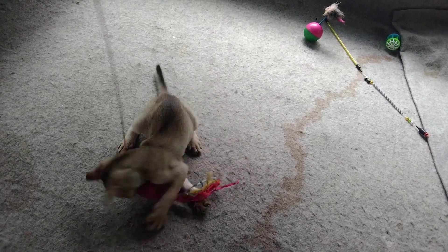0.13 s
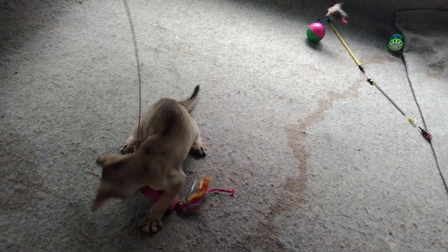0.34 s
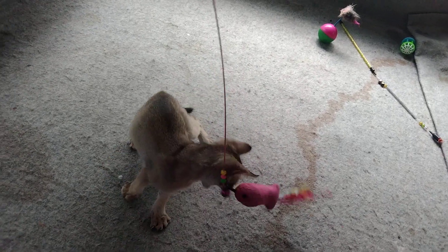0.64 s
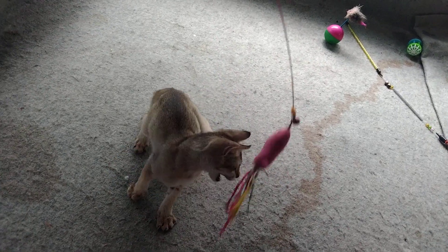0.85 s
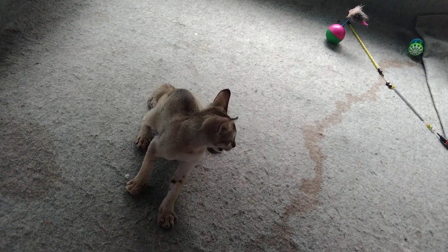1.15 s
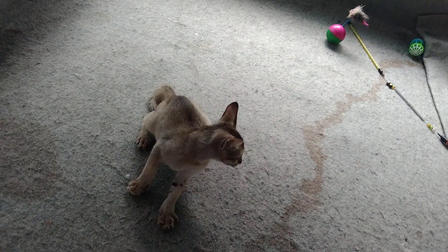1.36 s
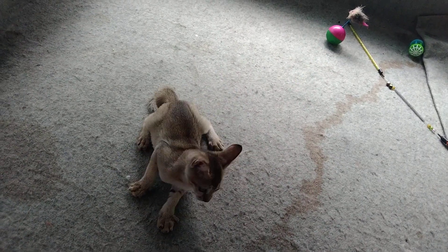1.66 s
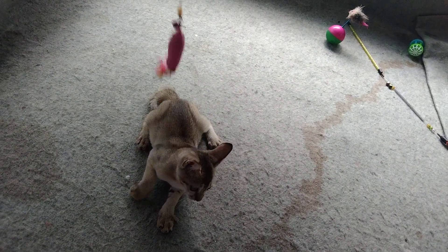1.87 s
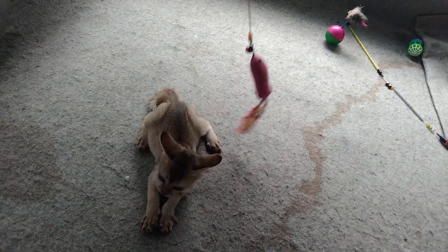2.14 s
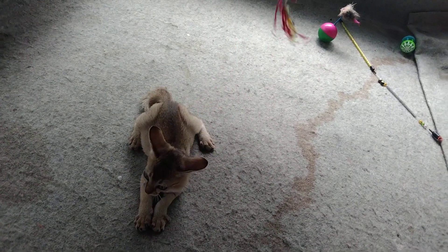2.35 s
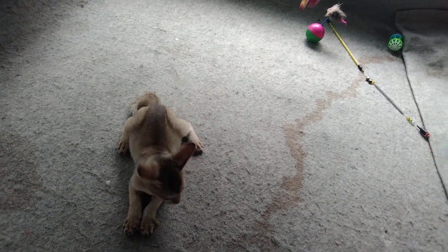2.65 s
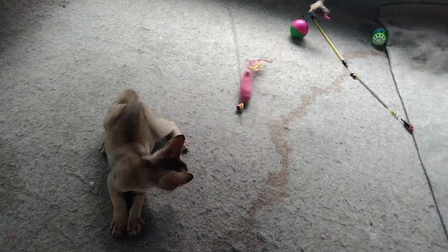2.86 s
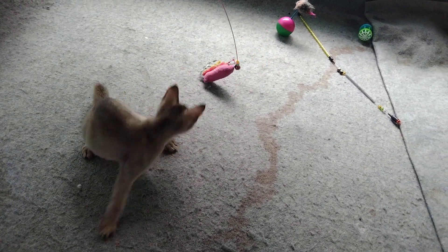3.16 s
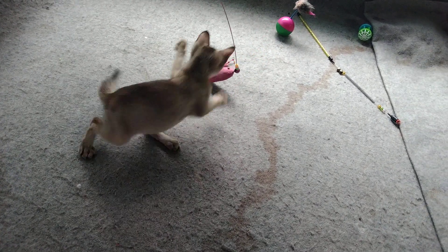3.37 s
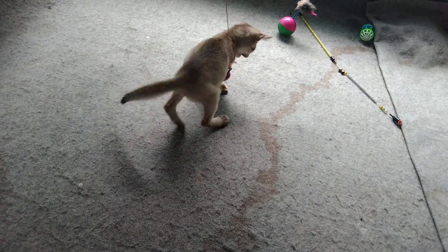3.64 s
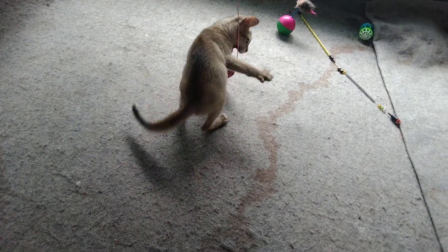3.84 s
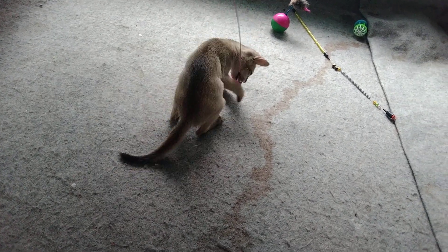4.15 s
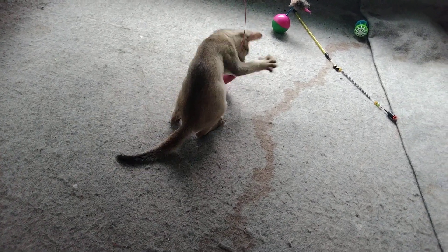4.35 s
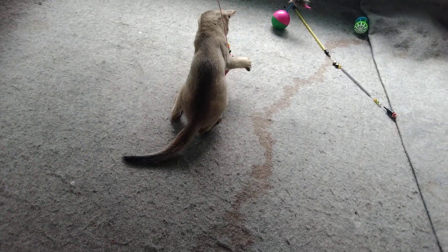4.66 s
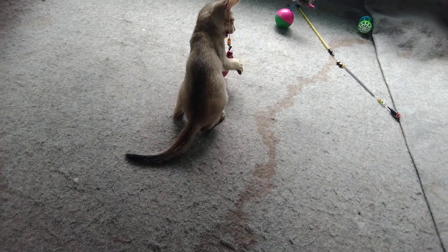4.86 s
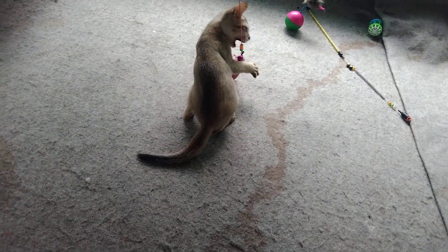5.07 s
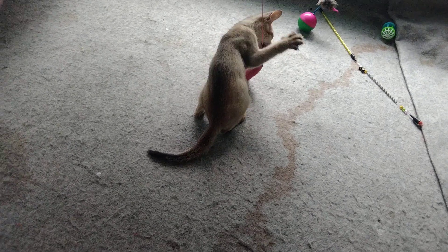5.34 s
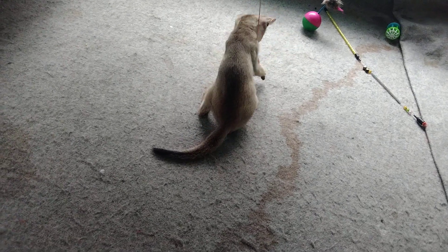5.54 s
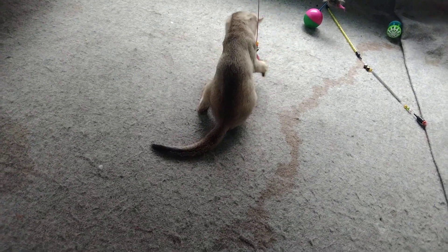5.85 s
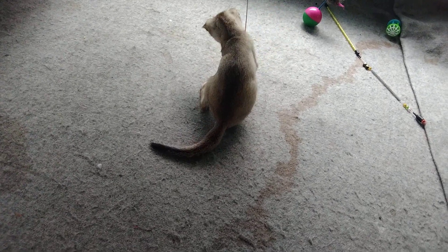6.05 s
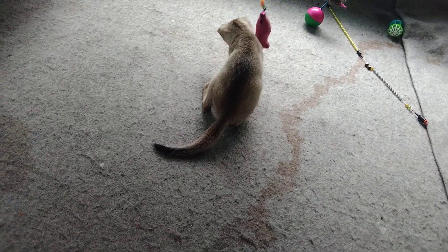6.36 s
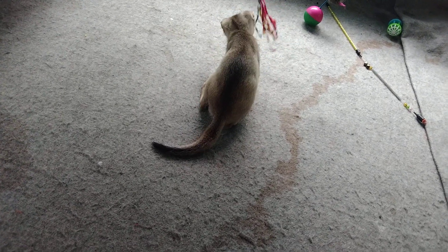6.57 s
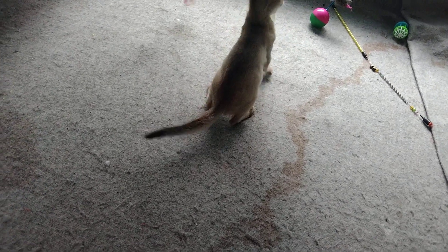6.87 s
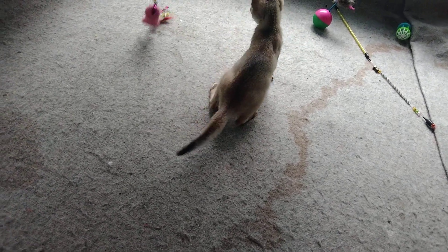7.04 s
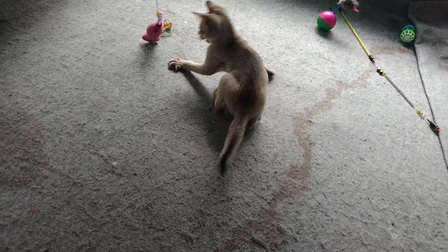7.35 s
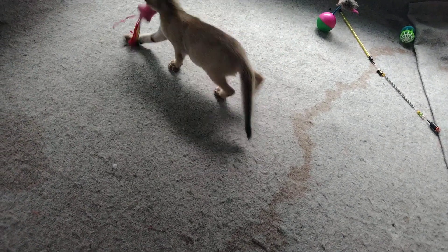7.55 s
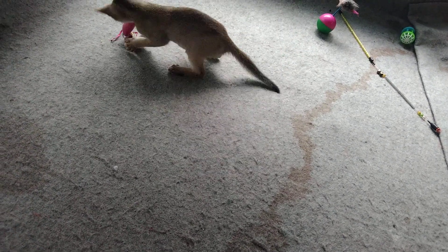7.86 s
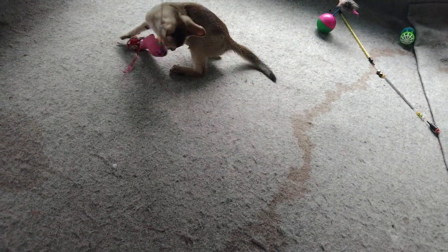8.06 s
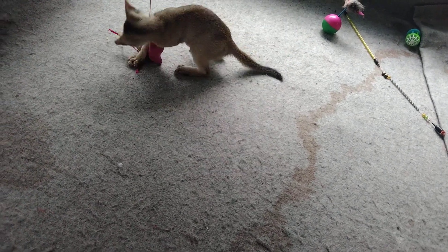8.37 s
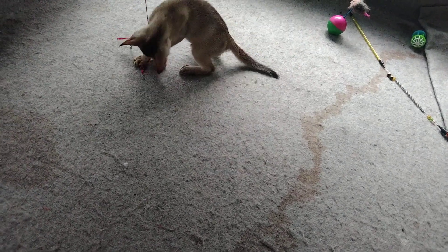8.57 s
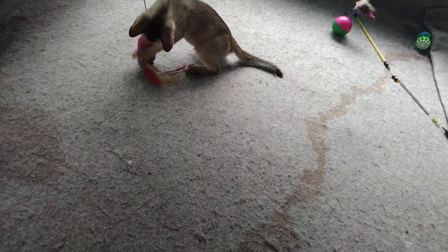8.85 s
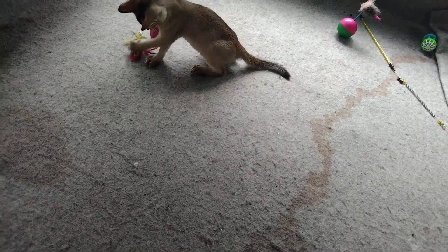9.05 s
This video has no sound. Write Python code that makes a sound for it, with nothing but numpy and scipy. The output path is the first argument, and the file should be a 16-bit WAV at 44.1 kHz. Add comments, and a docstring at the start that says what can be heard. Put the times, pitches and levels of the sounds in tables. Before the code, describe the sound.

A close, dry indoor sound of a tiny slotted bell on a wand toy over carpet. Two light tinkles come around 0.2 s, then a dense, bright rattle from 0.6 to 1.0 s, its loudest stroke near 0.65, with rustly scuffs. From 1.2 to 2.7 s only faint separate tinkles remain, with a soft airy swish around 1.8-2.1. At 2.9 s a strong knock, soft thud and sharp ring land together. Scuffing, crackle and small jingles follow at 3.5-3.7 and 4.0-4.7 s. Whooshes pass at 5.3-5.9 s amid sparse, weak tinkles that continue to 7 s. Jingling thickens from 7.1, peaks brightly at 8.1, thins, then rattles again with knocks from 8.9 to 9.2 s. Faint fuzzy chirps and an uneven low hum lie far beneath, over a quiet room floor.

```python
"""Wand-toy bell on a carpet

A small slotted metal bell on a wand toy is jerked about over a carpet while a kitten paws at it.
The loose pellet rings the shell as decaying sine modes, and its next contacts damp them again.
Knocks, swishes, dragging and thuds are shaped noise; faint narrow chirps come and go.
Beneath lie a low machine hum, built of a tone and noise, and the steady floor of a quiet room."""
import sys
import numpy as np
from scipy import signal
from scipy.fft import rfft, irfft
from scipy.io import wavfile
from scipy.ndimage import uniform_filter1d

SR = 44100
rng = np.random.default_rng(int(sys.argv[2]) if len(sys.argv) > 2 else 0)


def pcm_store(signal):
    """Save signal as 16-bit PCM."""
    levels = np.round(np.clip(np.atleast_2d(signal), -1, 1) * 32767)
    wavfile.write(sys.argv[1], SR, levels.astype(np.int16).T)


N = 406161
T = np.arange(N) / SR
SHELL_HZ, TOP_HZ = 6489, 15465  # the shell's main and highest modes


def amp(db):
    """Turns dB into a linear gain."""
    return 10 ** (np.asarray(db) / 20)


def evened(x):
    """Scales a sound to rms 1."""
    return x / np.sqrt(np.mean(x ** 2) + 1e-20)


def add(mix, s, sound):
    """Adds a sound to the mix from s seconds on."""
    part = mix[max(round(s * SR), 0):][:len(sound)]
    part += sound[:len(part)]


def columns(table):
    """Each column of a curve table, sample by sample."""
    s, *cols = np.transpose(table)
    return [np.interp(T, s, c) for c in cols]


def resonate(x, hz, width):
    """A steep resonance that follows the curve hz: shift down, smooth twice, shift back."""
    turn = np.exp(2j * np.pi * np.cumsum(hz * np.ones(len(x))) / SR)
    r = np.exp(-np.pi * width / SR)
    smooth = signal.lfilter([(1 - r) ** 2], [1, -2 * r, r * r], x / turn)
    return 2 * (turn * smooth).real


def band(x, lo_hz, hi_hz):
    """Keeps what lies between two frequencies."""
    sos = signal.butter(4, [lo_hz, hi_hz], "bandpass", fs=SR, output="sos")
    return signal.sosfilt(sos, x)


# The shell's modes. Each row: multiple of the main mode, level in dB, share of the strike's ring time.
SHELL_MODES = [(1.005, -3.5, .62), (.997, -14, .62), (1.099, -27, .9), (1.189, -31, 0.3),
               (1.301, -36, 0.25)]
RING_BEND = 2.6  # above 1 the ring first holds, then drops ever faster as the pellet stops it
REST_DB, REST_T60 = -20, 0.2  # a faint rest sings on: dB under the ring, s


def ring(hz, t60, size, spread_db=5.0):
    """The shell's modes after one blow; where the pellet lands sets their strength and phase."""
    t = np.arange(size) / SR
    start = rng.random(len(SHELL_MODES))
    place_db = spread_db * rng.standard_normal(len(SHELL_MODES))
    place_db[0] = 0
    rest = amp(REST_DB - 60 * t / REST_T60)
    modes = np.zeros(size)
    for (multiple, db, share), phase, more_db in zip(SHELL_MODES, start, place_db):
        held = amp(-60 * (t / (t60 * share)) ** RING_BEND)
        modes += amp(db + more_db) * (held + rest) * np.sin(2 * np.pi * (hz * multiple * t + phase))
    return modes * np.minimum(t / 0.00068, 1)  # soft onset


def click(parts, t60, upper_db, rise=0.0004, first_s=0.0035, lo_hz=1800):
    """A short burst of noise through two resonances that differ a little each time; rms 1 at its start."""
    t = np.arange(6000) / SR
    burst = rng.standard_normal(len(t)) * amp(-60 * t / t60) * np.minimum(t / rise, 1)
    low, high = (evened(resonate(burst, hz + 0.069 * width * rng.standard_normal(), width))
                 for hz, width in parts)
    sound = band(low - amp(upper_db) * high, lo_hz, 21000)
    return sound / np.sqrt(np.mean(sound[t < first_s] ** 2))


def bounced(sound, lag_s=0.0074, loss_db=-3.5, first_db=-7.5):
    """A contact that rebounds three times at chance moments with chance strength."""
    out = np.concatenate([sound, np.zeros(6000)])
    lags = lag_s * np.cumsum(.4 + np.minimum(rng.exponential(size=3), 3))
    for k, lag in enumerate(lags):
        gain = amp(first_db + loss_db * k + 3.8 * rng.standard_normal())
        add(out, lag, gain * sound * rng.choice([-1, 1]))
    return out


SPARK_HZ = 16200  # centre of the sparkle's wide upper part
# Resonances of the pellet's tick and of the top sparkle. Each row: centre in Hz, width in Hz.
TICK_PARTS = [(5650, 804), (7600, 1500)]
SPARKLE_PARTS = [(TOP_HZ, 220), (SPARK_HZ, 14000)]
# Pellet strikes. Each row: start in seconds, ring level in dB, ring time (t60) in seconds before each
# mode's share and the damping, tick level in dB, top sparkle level in dB.
PELLET_STRIKES = [(0.0223, -60, 0.045, -67, -88.5), (0.0917, -52, 0.11, -65, -81),
                  (0.162, -33.5, 0.051, -51, -76), (0.188, -28.5, 0.039, -45, -69),
                  (0.21, -41, 0.031, -59, -75), (0.2853, -51, 0.061, -60, -86),
                  (0.3341, -51.5, 0.07, -54, -71), (0.5924, -50, 0.048, -52.5, -74),
                  (0.618, -34.5, 0.089, -40.5, -52), (0.628, -28.5, 0.04, -47, -53),
                  (0.6513, -18.5, 0.04, -39.5, -50.5), (0.6822, -44, 0.086, -35.5, -59),
                  (0.6938, -25.5, 0.066, -47, -57), (0.7262, -29, 0.084, -41, -58),
                  (.7305, -41, .03, -37, -62), (0.7337, -27.5, 0.052, -51, -64),
                  (0.7514, -31, 0.064, -46, -64), (0.7822, -31.5, 0.029, -47, -70),
                  (0.8031, -27, 0.046, -43.5, -55), (.829, -33, 0.034, -45, -58),
                  (0.836, -32.5, 0.06, -54, -61), (.8505, -46, .03, -46, -52),
                  (0.856, -27.5, 0.043, -39, -53), (0.948, -43.5, 0.14, -52, -57),
                  (0.9863, -30, 0.042, -41, -51), (.998, -37.5, 0.045, -42, -64),
                  (1.1777, -46, 0.065, -60, -73), (1.1897, -40, 0.061, -63, -72),
                  (1.2201, -42.5, 0.23, -49.5, -70), (1.3079, -60, 0.024, -55.5, -71),
                  (1.3673, -43, 0.11, -49.5, -59.5), (1.4671, -44.5, 0.041, -62, -77),
                  (1.5444, -56, 0.099, -72, -91), (1.6102, -51, 0.1, -67, -95),
                  (1.6726, -55, 0.059, -69, -82), (1.7684, -44, 0.052, -65, -80),
                  (2.0208, -47, 0.083, -56, -77), (2.0428, -41.5, 0.091, -57.5, -69),
                  (2.082, -46.5, 0.07, -58, -71), (2.134, -40.5, 0.07, -55, -72),
                  (2.168, -40.5, 0.055, -54, -73), (2.3627, -40.5, 0.041, -57.5, -69),
                  (2.5384, -55, 0.2, -58, -67), (2.588, -46, 0.099, -54, -70),
                  (2.6389, -31, 0.069, -43.5, -63), (2.7327, -45, 0.041, -55, -72),
                  (2.8449, -44.5, 0.052, -47, -54), (2.913, -27.5, 0.078, -30, -36),
                  (2.9264, -28.5, 0.072, -53, -52), (3.0101, -24, 0.038, -41.5, -62),
                  (3.0624, -44, 0.032, -52, -79), (3.1951, -58.5, 0.11, -58.5, -93),
                  (3.2809, -54.5, 0.072, -58, -91), (3.4241, -59, 0.039, -59.5, -67),
                  (3.512, -51, 0.041, -38.5, -47), (3.5384, -45, 0.035, -43, -58),
                  (3.5584, -44, 0.093, -47, -57), (3.5862, -41, 0.05, -46, -63),
                  (3.597, -41, .05, -46, -62), (3.611, -44, 0.045, -50, -70),
                  (3.6404, -52, 0.06, -48.5, -52), (3.647, -56, .04, -52, -60),
                  (3.6601, -44.5, 0.06, -53, -59), (3.678, -45.5, .07, -54, -62),
                  (3.7194, -58, 0.065, -66, -72), (3.7379, -45.5, 0.13, -53, -56),
                  (3.8123, -61, 0.07, -58, -60.5), (3.8975, -45, 0.087, -63, -71),
                  (3.9208, -43.5, 0.045, -69, -66), (4.0133, -39, 0.11, -48, -62),
                  (4.0394, -41, 0.2, -44.5, -55), (4.1679, -51.5, 0.096, -54.5, -67),
                  (4.2335, -32.5, 0.045, -40, -66), (4.3515, -51, 0.06, -64, -103),
                  (4.4184, -59, 0.098, -64, -89), (4.4598, -38.5, 0.053, -51.5, -65),
                  (4.5107, -43, 0.12, -52, -58), (4.5401, -35, 0.028, -43.5, -44),
                  (4.573, -43, 0.065, -62, -65), (4.6299, -52, 0.035, -53, -75),
                  (4.645, -50, .05, -50.5, -75), (4.7067, -45, 0.29, -64, -56.5),
                  (4.7192, -43.5, 0.15, -54.5, -63.5), (4.9672, -55.5, .05, -60.5, -72),
                  (5.0365, -54, 0.069, -60.5, -91), (5.2714, -42, 0.029, -60, -79),
                  (5.3108, -49.5, 0.034, -64, -71), (5.3418, -49, 0.088, -68, -81),
                  (5.448, -50.5, 0.038, -58, -65), (5.4776, -60, 0.034, -53.5, -62),
                  (5.5624, -50, 0.21, -54, -62), (5.69, -53.5, 0.33, -64, -88),
                  (5.7209, -47.5, 0.064, -54.5, -81), (5.976, -52, 0.11, -60.5, -78),
                  (6.0521, -45, 0.058, -52.5, -72), (6.0921, -50, 0.15, -56, -69),
                  (6.1539, -49, 0.088, -59, -66), (6.2277, -44, 0.12, -66, -62),
                  (6.3405, -39.5, 0.041, -64, -75), (6.3836, -47.5, 0.051, -61, -77),
                  (6.4647, -49.5, 0.081, -67, -69), (6.5233, -48.5, 0.23, -58.5, -74),
                  (6.5885, -49.5, 0.1, -61, -79), (6.6295, -44.5, 0.095, -58, -73.5),
                  (6.9522, -46.5, 0.037, -62, -76.5), (7.005, -51, 0.044, -54.5, -69),
                  (7.0756, -56, 0.04, -65, -93), (7.1115, -57, 0.19, -59, -72),
                  (7.1558, -39.5, 0.064, -48, -68), (7.1904, -39, 0.061, -52, -63),
                  (7.2175, -43, 0.023, -51, -69), (7.2483, -41, 0.036, -53, -80),
                  (7.299, -32.5, 0.034, -55, -72), (7.3238, -32, 0.035, -49.5, -70),
                  (7.3457, -36.5, 0.033, -57, -86), (7.4524, -46, 0.099, -57, -77),
                  (7.4714, -38.5, 0.065, -50, -63), (7.5606, -48.5, 0.13, -49, -63),
                  (7.5834, -38.5, 0.065, -46, -66), (7.6101, -40.5, 0.36, -49, -54),
                  (7.6606, -41.5, 0.21, -47.5, -50.5), (7.741, -51, 0.07, -52.5, -59),
                  (7.7669, -41.5, 0.078, -64, -63), (7.8727, -40.5, 0.13, -56, -77),
                  (7.9377, -47.5, 0.041, -71, -65), (8.0421, -47.5, 0.05, -52.5, -53),
                  (8.08, -25, 0.082, -45, -65), (8.0842, -22, 0.041, -37, -51),
                  (8.1265, -52, 0.029, -55, -68), (8.1529, -41.5, 0.066, -62, -75),
                  (8.1668, -45, 0.041, -56, -73), (8.2533, -52, 0.065, -53, -71),
                  (8.2721, -40, 0.05, -47.5, -65), (8.284, -42, 0.041, -58, -70),
                  (8.317, -40, 0.021, -63, -76), (8.35, -40.5, 0.044, -58, -57),
                  (8.359, -41, 0.08, -60, -64), (8.4462, -39.5, 0.05, -54, -69),
                  (8.5445, -56, 0.039, -62, -80), (8.5769, -42, 0.017, -56.5, -70),
                  (8.7354, -56.5, 0.061, -60, -80), (8.9434, -50, 0.06, -53, -61),
                  (8.963, -28, 0.033, -41, -47), (8.977, -29.5, 0.057, -43, -49),
                  (8.989, -32.5, 0.089, -48, -56), (9.011, -45, .05, -43, -52),
                  (9.0297, -40, 0.053, -47, -61), (9.0573, -42.5, 0.16, -53, -63),
                  (9.0983, -43, 0.055, -55, -62), (9.1602, -35, 0.027, -43, -62),
                  (9.168, -33, 0.034, -44.5, -64)]


def strikes(kept=0.26):
    """Each strike rings the shell; the pellet's next contacts swallow part of the ring."""
    shell, top = np.zeros(N), np.zeros(N)
    times = np.array([row[0] for row in PELLET_STRIKES])
    for s, ring_db, t60, tick_db, sparkle_db in PELLET_STRIKES:
        t = s + np.arange(8000) / SR
        later = np.searchsorted(times, t) - np.searchsorted(times, s, "right")
        damping = uniform_filter1d(kept ** np.maximum(later, 0), size=60)
        hz = SHELL_HZ * (1 + 0.003 * rng.standard_normal())  # the resting pellet detunes the shell
        add(shell, s, amp(ring_db) * ring(hz, t60, len(t)) * damping)
        tick = click(TICK_PARTS, 0.004, -9.5, first_s=0.003, lo_hz=4800)
        add(shell, s, amp(tick_db) * bounced(tick, lag_s=0.0045, loss_db=-2.0))
        add(top, s, amp(sparkle_db) * click(SPARKLE_PARTS, 0.014, -2.7))
        top_hz = TOP_HZ * (1 + 0.0017 * rng.standard_normal())
        high = amp(-60 * (t - s) / 0.095) * np.sin(2 * np.pi * top_hz * t)
        add(top, s, amp(sparkle_db - 0.5) * high * damping)
    return shell, top


# Glancing blows on the slot's lips. Each row: start in seconds, peak level in dB before the decay.
LIP_BLOWS = [(.0914, -57), (.9624, -51), (3.5214, -50), (3.6651, -49), (3.7209, -52), (4.4199, -62),
             (4.7195, -55), (7.453, -50), (7.935, -64), (8.358, -61)]
LIP_HZ, LIP_T60 = 7125, 0.18  # the second mode, which rings alone: Hz, s


def lips():
    """A thin higher ring that the pellet does not stop: one decaying sine a blow."""
    t, out = np.arange(8000) / SR, np.zeros(N)
    for s, db in LIP_BLOWS:
        fade = amp(db - 60 * t / LIP_T60) * np.minimum(t / 0.0012, 1)
        add(out, s, fade * np.sin(2 * np.pi * LIP_HZ * t))
    return out


def after(times, levels_db, settle_db_per_s):
    """A gain that jumps at each event and sinks steadily afterwards."""
    jumps, fall = np.full(N, -200.), settle_db_per_s * T
    jumps[np.round(np.asarray(times) * SR).astype(int)] = levels_db
    sinking_db = np.maximum.accumulate(jumps + fall) - fall
    return uniform_filter1d(amp(sinking_db), size=200)


# The toy in motion, as curves. Each row: time in seconds, base level in dB of the pellet's rolling,
# of the dragging on the pile and of the fine hiss.
MOTION = [(0.0, -57, -74, -80.5), (0.54, -84, -84.5, -83.5), (0.82, -49, -74, -73),
          (1.05, -73.5, -93.5, -88.5), (1.48, -62, -92.5, -91.5), (1.9, -78.5, -83, -87.5),
          (2.92, -62.5, -81, -88.5), (3.41, -77, -73, -87), (3.72, -57.5, -68, -90), (4.33, -72, -80, -82),
          (4.64, -50.5, -67, -74), (4.87, -73, -84.5, -88.5), (5.23, -75, -90, -100),
          (5.57, -64.5, -77, -87.5), (5.98, -68.5, -83.5, -96), (6.23, -60, -74, -80.5),
          (6.46, -62, -97, -90.5), (6.69, -81, -103, -90.5), (7.62, -66, -77.5, -78.5),
          (8.21, -69, -77.5, -90.5), (8.85, -81, -77.5, -90), (9.21, -57, -75, -76)]
ROLL_AFTER_DB, ROLL_SETTLES_DB_PER_S = -32.5, 98.5  # the pellet rolls on after each strike


def rolling(per_s=260, spread_db=5.5, tick_db=-9.0, count=6):
    """Many tiny contacts of chance size and place, each a tick and a short ring."""
    sizes = amp(spread_db * np.minimum(rng.exponential(1, N), 2.5))
    hits = sizes * (rng.random(N) < per_s / SR)
    place, rattle = rng.integers(0, count, N), np.zeros(N)
    for k in range(count):
        touch = ring(SHELL_HZ * (1 + .003 * rng.standard_normal()), 0.046, size=6000)
        touch = touch + amp(tick_db) * click(TICK_PARTS, 0.0044, -10.5, lo_hz=4700)
        rattle += signal.oaconvolve(hits * (place == k), touch)[:N]
    s, ring_db = np.transpose(PELLET_STRIKES)[:2]
    rolls_on = after(s, ring_db + ROLL_AFTER_DB, ROLL_SETTLES_DB_PER_S)
    return (amp(columns(MOTION)[0]) + rolls_on) * evened(rattle)


# Resonances of the toy's body and of the crackle. Each row: centre in Hz, width in Hz.
BODY_PARTS = [(2500, 540), (3700, 2700)]
CRACKLE_PARTS = [(9500, 3800), (13500, 1900)]
# Paws and pile jolt the toy's body. Each row: start in seconds, knock peak in dB,
# knock decay time (t60) in seconds, crackle level in dB.
JOLTS = [(0.134, -68, 0.044, -66), (0.346, -58.5, 0.051, -71), (0.374, -84, 0.04, -63),
         (0.5028, -55, 0.12, -68), (0.559, -50.5, 0.036, -74), (0.855, -46, 0.047, -47.5),
         (0.879, -50.5, 0.048, -55), (.964, -67, .03, -56), (0.9816, -52, 0.04, -60),
         (2.5739, -64, 0.064, -59), (2.85, -45, 0.062, -59), (2.874, -47, 0.03, -54),
         (2.91, -32.5, 0.055, -44), (3.024, -46.5, 0.032, -62), (3.1004, -54.5, 0.26, -75),
         (3.1694, -50, 0.024, -89), (3.5094, -38.5, 0.048, -51), (3.5387, -46.5, 0.024, -66),
         (3.6404, -49, 0.024, -56), (3.7194, -54, 0.024, -62), (4.0087, -38.5, 0.015, -56),
         (4.0279, -43.5, 0.1, -52.5), (4.054, -44, .02, -58), (4.067, -39.5, 0.03, -54),
         (4.08, -46, 0.01, -58), (4.4995, -40, 0.1, -69), (4.5262, -34.5, 0.016, -47.5),
         (4.558, -42, 0.021, -67), (4.604, -42.5, 0.016, -52), (4.7, -46.5, 0.046, -67),
         (5.1757, -45.5, 0.022, -92), (5.4495, -44, 0.035, -53.5), (5.564, -51.5, 0.022, -58.5),
         (6.2266, -52.5, 0.15, -63), (7.016, -54, 0.033, -59.5), (7.1505, -54.5, 0.26, -67),
         (7.558, -42, 0.048, -52.5), (7.6224, -40, 0.029, -58), (7.763, -52, 0.033, -66),
         (7.814, -51.5, 0.029, -69), (7.905, -51.5, 0.027, -64.5), (8.043, -47.5, 0.03, -57),
         (8.0678, -48.5, 0.043, -71), (8.1376, -44.5, 0.018, -54.5), (8.1852, -47, 0.016, -66),
         (8.2686, -49, 0.024, -57), (8.407, -50.5, 0.038, -68), (8.456, -52, 0.051, -66),
         (8.574, -49.5, 0.025, -70), (8.736, -48, 0.026, -66.5), (8.9208, -38, 0.017, -60),
         (8.9447, -41, 0.062, -54), (8.995, -41, 0.06, -59), (9.011, -40, 0.038, -50),
         (9.084, -50, 0.1, -67), (9.133, -52, 0.034, -74), (9.1628, -43, 0.022, -56)]


def knocks():
    """Dull noise scuffs of the body with a stuttering crackle of foil and feathers above."""
    out = np.zeros(N)
    for s, knock_db, t60, crackle_db in JOLTS:
        body = click(BODY_PARTS, t60, -6.5, rise=0.0023)
        add(out, s, amp(knock_db) * body / abs(body).max())
        crackle = click(CRACKLE_PARTS, 0.33 * t60, -3.0, first_s=0.0021)
        add(out, s, amp(crackle_db) * bounced(crackle, lag_s=0.005, first_db=-13.5))
    return out


def streaked(x, patchy_db):
    """Narrow bands of the sound swell and sink for a tenth of a second or less at a time."""
    z = signal.stft(x, nperseg=512)[2]
    patches = rng.standard_normal(z.shape[::-1]).T
    patches = uniform_filter1d(patches, size=3, axis=0)
    patches = evened(uniform_filter1d(patches, size=24, axis=1))
    return signal.istft(z * amp(patchy_db * patches), nperseg=512)[1][:N]


def whistle(start_hz, end_hz, width, length, rise, waver=.006):
    """A sharp-edged gliding band of noise that swells quickly and fades."""
    u = np.arange(0, 2, 1 / (SR * min(length, .9)))  # time in lengths; the tail lasts one more
    hz = start_hz + (end_hz - start_hz) * np.minimum(u, 1)
    a, b, c = rng.standard_normal((3, 2 * SR))
    hz = hz * (1 + waver * evened(resonate(c, 0, 12))[-len(u):])
    sos = signal.butter(8, width / 2, fs=SR, output="sos")
    slow = signal.sosfilt(sos, a + 1j * b)[-len(u):]
    note = (slow * np.exp(2j * np.pi * np.cumsum(hz) / SR)).real  # shifted up to the gliding centre
    return evened(note) * np.minimum(u * length / rise, 1) * np.exp(-1.5 * u ** 2)


# The toy whips through the air. Each row: start in seconds, level in dB before flutter and streaks,
# start pitch in Hz, end pitch in Hz, bandwidth in Hz, glide length in seconds (held to 0.9).
SWISHES = [(1.815, -53.5, 2290, 2130, 730, 0.22), (2.03, -63, 2020, 2100, 340, 0.22),
           (2.05, -67, 2520, 2950, 130, 0.17), (2.2, -69.5, 2930, 2900, 150, 0.27),
           (2.17, -71.5, 2700, 2550, 220, 0.35), (1.9, -72, 3750, 3900, 1020, 0.2),
           (2.525, -74, 2600, 2650, 260, .2), (1.59, -75.5, 4650, 4680, 180, 0.25),
           (1.796, -72.5, 5000, 4120, 300, 0.93), (2.3, -72.5, 3420, 3400, 820, 0.33),
           (3.17, -68, 3420, 3420, 420, 0.12), (4.44, -58, 2350, 2610, 1020, 0.15),
           (4.831, -76.5, 4960, 4500, 290, 0.35), (5.03, -74, 4650, 4320, 720, 0.15),
           (0.52, -65, 2180, 2623, 1040, 0.17), (5.333, -53, 2200, 2640, 510, 0.19),
           (5.569, -49, 2390, 2030, 530, 0.12), (5.663, -51.5, 2310, 2320, 496, 0.21),
           (7.463, -56.5, 2170, 2100, 590, .27), (7.43, -70.5, 2960, 3100, 750, 0.15)]


def swishes():
    """Air rushing past the fluttering feathers and string: gliding bands of noise."""
    out = np.zeros(N)
    for s, db, *shape in SWISHES:
        add(out, s, amp(db) * whistle(*shape, rise=0.047))
    flutter = amp(1.6 * evened(resonate(rng.standard_normal(N), 0, 150)))
    return band(streaked(out * flutter, 2.5), 1700, 4900)


# the toy rustles on after each jolt
DRAG_AFTER_DB, HISS_AFTER_DB, DRAG_SETTLES_DB_PER_S = -29.5, -26, 82.5
SCUFF_DB, SCUFF_AFTER_DB, SCUFF_SETTLES_DB_PER_S = -6.5, -25.5, 75.5  # SCUFF_DB: against the drag


def moving(grains_per_s=350, grain_db=5.0):
    """Grainy scuffing on the pile, rustle above it and fine hiss in which the shell's top mode sings."""
    _, drag_db, hiss_db = columns(MOTION)
    s, knock_db, _, crackle_db = np.transpose(JOLTS)
    scuff_gain = amp(drag_db + SCUFF_DB) + amp(SCUFF_AFTER_DB) * after(s, knock_db, SCUFF_SETTLES_DB_PER_S)
    rustle_gain = amp(drag_db) + amp(DRAG_AFTER_DB) * after(s, knock_db, DRAG_SETTLES_DB_PER_S)
    hiss_gain = amp(hiss_db) + amp(HISS_AFTER_DB) * after(s, crackle_db, DRAG_SETTLES_DB_PER_S)
    a, b, c = rng.standard_normal((3, N))
    sizes = amp(grain_db * np.minimum(rng.exponential(1, N), 4))
    grains = sizes * (rng.random(N) < grains_per_s / SR)
    bits = evened(uniform_filter1d(grains, size=60))
    rough = 0.84 + bits
    scuff = streaked(band(a * rough, 2080, 3120), 6.5)
    rustle = streaked(band(b * rough, 3200, 7500), 7.5)
    hiss = evened(streaked(band(c * (3.5 + bits), 4600, 17000), 1.1))
    hiss = hiss + amp(-5.5) * evened(resonate(a, TOP_HZ, 110))
    return scuff_gain * evened(scuff) + rustle_gain * evened(rustle) + hiss_gain * evened(hiss)


# The toy and paws land on the carpet. Each row: start in seconds, level of the puff in dB before the
# decay, decay time (t60) in seconds, hollow note in Hz.
THUDS = [(.12, -76.5, 0.079, 295), (2.913, -68, 0.14, 395), (5.139, -78, 0.053, 396),
         (8.225, -79, 0.095, 407), (8.995, -83, 0.22, 580)]


def thud():
    """Dull wide puffs of noise on the pile, each with a hollow low note and a weaker one above."""
    t, out = np.arange(8000) / SR, np.zeros(N)
    for s, db, t60, hz in THUDS:
        puff = rng.standard_normal(len(t))
        notes = amp(7.5) * evened(resonate(puff, hz, 100))
        notes += amp(-2.0) * evened(resonate(puff, 1.7 * hz, 150))
        fade = amp(db - 60 * t / t60) * np.minimum(t / 0.004, 1)
        add(out, s, fade * (evened(band(puff, 320, 1700)) + notes))
    return out


# Faint narrow chirps. Each row: start in seconds, level in dB before flutter, start pitch in Hz,
# glide length in seconds.
CHIRPS = [(.005, -76, 4540, .08), (0.097, -80, 1030, 0.096), (0.139, -77, 2530, 0.11),
          (0.149, -79, 1984, 0.13), (0.296, -71, 2850, .03), (0.499, -74.5, 1350, 0.095),
          (.75, -81, 1975, .12), (0.795, -76, 2530, .09), (.94, -70, 2350, .07), (1.298, -79, 3030, 0.04),
          (1.417, -81, 2840, 0.082), (1.605, -82.5, 1950, 0.1), (1.609, -85, 1374, 0.098),
          (2.432, -72.5, 1830, 0.032), (2.829, -76, 1625, 0.073), (3.496, -79, 972, 0.082),
          (3.504, -71.5, 1310, 0.19), (3.624, -69.5, 873, 0.06), (3.692, -79, 813, 0.13),
          (3.722, -72.5, 1268, 0.21), (3.835, -74.5, 2220, 0.1), (3.915, -68.5, 902, 0.057),
          (4.241, -69, 1340, 0.29), (4.41, -68, 2030, 0.046), (4.519, -75, 967, 0.097),
          (4.602, -76, 1530, 0.12), (4.831, -73, 1222, 0.11), (4.855, -74.5, 787, 0.064),
          (4.964, -74.5, 1902, 0.67), (4.97, -73, 774, .11), (5.476, -80, 880, 0.11),
          (6.072, -75, 1400, 0.087), (6.102, -73.5, 2500, 0.18), (6.047, -78.5, 3060, .15),
          (6.42, -85.5, 3430, 0.14), (6.432, -80.5, 3050, 0.087), (6.442, -76.5, 2550, .12),
          (6.714, -76.5, 1208, 0.13), (6.907, -80.5, 1376, 0.084), (7.165, -81.5, 1524, 0.093),
          (7.283, -82.5, 1185, 0.18), (7.32, -81, 1775, 0.15), (7.419, -80.5, 1487, 0.34),
          (7.497, -80.5, 1280, 0.06), (8.29, -71.5, 1253, .11), (8.391, -78, 1590, 0.043)]


def chirps(waver=.014, flutter_db=4.0):
    """Fuzzy narrow notes of noise that sink slightly, waver in pitch and flutter in level."""
    out = np.zeros(N)
    for s, db, hz, length in CHIRPS:
        add(out, s, amp(db) * whistle(hz, .98 * hz, 55 + 0.039 * hz, length, 0.022, waver))
    return out * amp(flutter_db * evened(resonate(rng.standard_normal(N), 0, 20)))


# Weaker hum lines. Each row: multiple of the low tone, level in dB.
OVERTONES = [(1.5, -11.5), (2.5, -21.5), (3, -25.5), (4, -25.5)]
# Machine hum, as curves. Each row: time in seconds, level in dB of the low tone with its lines and
# rumble, level in dB of its octave.
HUM = [(0.0, -91, -98), (0.05, -94, -90.5), (1.82, -81, -85.5), (2.18, -72, -92), (2.84, -81.5, -100),
       (3.0, -61.5, -75), (3.23, -70, -95), (4.82, -66, -77.5), (5.1, -74, -92), (5.46, -64.5, -78.5),
       (6.21, -83.5, -77.5), (6.41, -70.5, -76.5), (6.69, -84, -78.5), (7.62, -74, -80.5),
       (7.8, -64, -63.5), (7.95, -73.5, -78.5), (8.47, -67.5, -65.5), (9.21, -81.5, -80)]
HUM_HZ = 75.1


def hum():
    """A fluttering low tone with its octave and weaker lines, over lumpy rumble that swells with it."""
    low_db, octave_db = columns(HUM)
    a, b, c, d, e = rng.standard_normal((5, N))
    lumps = amp(2.0 * evened(resonate(e, 0, 9.0)))
    low = np.sqrt(2) * np.sin(2 * np.pi * HUM_HZ * T) + .55 * evened(resonate(a, HUM_HZ, 9.5))
    lines = sum(amp(db) * evened(resonate(b, k * HUM_HZ, 11.0)) for k, db in OVERTONES)
    rumble = amp(-8.5) * evened(resonate(d, 110, 60)) * lumps
    octave = evened(resonate(c, 2 * HUM_HZ, 11) * np.sqrt(lumps))
    return amp(low_db) * evened((low + lines) * np.sqrt(lumps) + rumble) + amp(octave_db) * octave


# Colour of the room floor. Each row: frequency in Hz, relative density in dB.
AIR_COLOUR = [(15, -41), (25, -21), (80, 0.5), (288, -7.5), (457, -17.5), (1730, -24.5), (2530, -23),
              (4020, -37), (6550, -10.5), (9330, -39.5), (15200, -37.5), (16500, -32)]
AIR_DB = -79  # rms of the whole floor


def air():
    """The steady floor of the room: white noise coloured in the spectrum."""
    hz, db = np.transpose(AIR_COLOUR)
    shape_db = np.interp(np.log(np.fft.rfftfreq(N, 1 / SR) + 1), np.log(hz + 1), db)
    return amp(AIR_DB) * evened(irfft(rfft(rng.standard_normal(N)) * amp(shape_db), N))


def room(x, t60):
    """A short soft tail: sparse taps of random sign dying away."""
    taps = np.zeros(SR // 2)
    at = np.arange(150, len(taps) - 20, 20)
    at = at + rng.integers(0, 20, len(at))
    taps[at] = rng.choice([-1., 1.], len(at)) * amp(-60 * at / SR / t60)
    return signal.oaconvolve(x, taps / np.linalg.norm(taps))[:N]


def scene():
    """Bell and body with their room tails, then the toy's motion, chirps, thuds, hum and air."""
    shell, top = strikes()
    shell = shell + rolling() + lips()
    body = top + knocks()
    tails = amp(-11.5) * room(shell, 0.15) + amp(-7.0) * room(body, 0.16)
    return (shell + body + tails + moving() + swishes() + chirps() + thud() + hum() + air())[None]


# Reach of the noise suppressor. Each row: frequency in Hz, most lowering in dB.
GATE_DEPTH = [(1200, 1), (2200, 4), (4000, 5), (8000, 3.5), (16000, 9.5)]


def suppress(x, margin_db=5.5, hold=0.882):
    """Lowers every narrow band that stays near its own quiet level; opens at once, closes slowly."""
    hz, _, z = signal.stft(x, SR, nperseg=512, noverlap=384)
    power = uniform_filter1d(abs(z) ** 2, size=3, axis=0)
    power = uniform_filter1d(power, size=5, axis=1)
    held = np.maximum(power, signal.lfilter([1 - hold], [1, -hold], power, axis=1))
    quiet = np.percentile(held, 15, axis=1)[:, None]
    over_db = 10 * np.log10(held / quiet)
    depth_db = np.interp(hz, *np.transpose(GATE_DEPTH))[:, None]
    shut = np.clip(1.5 - over_db / margin_db, 0, 1)
    return signal.istft(z * amp(-depth_db * shut), SR, nperseg=512, noverlap=384)[1][:N]


SHELF_HZ, EDGE_HZ = 15570, 16700  # the treble steps down, then ends


def lowpass(x, hz):
    """A very steep cut above hz that leaves the timing alone."""
    taps = signal.firwin(1023, hz, window=("kaiser", 8), fs=SR)
    return signal.oaconvolve(x, taps[None], "same")


def record(dry):
    """Noise suppression, a steep step down in the highest treble, then the band limit."""
    x = suppress(dry[0])[None]
    below, whole = lowpass(x, SHELF_HZ), lowpass(x, EDGE_HZ)
    return below + amp(-18.0) * (whole - below)


dry = scene()
out = record(dry)
pcm_store(out)
```